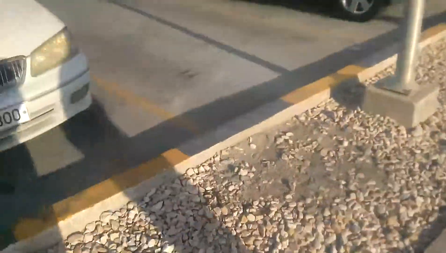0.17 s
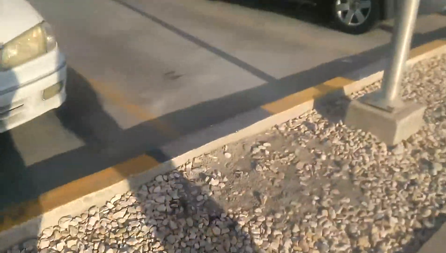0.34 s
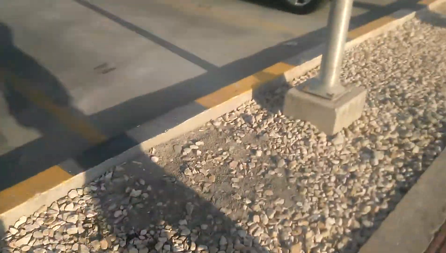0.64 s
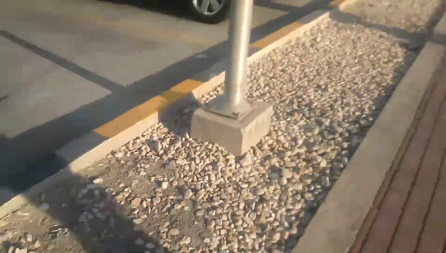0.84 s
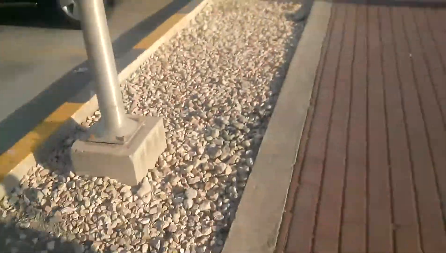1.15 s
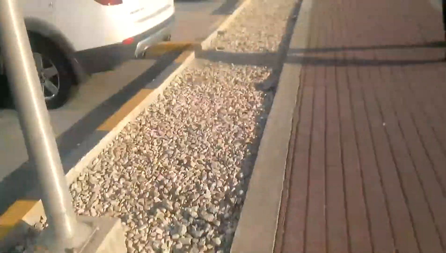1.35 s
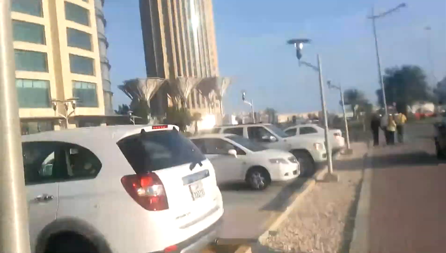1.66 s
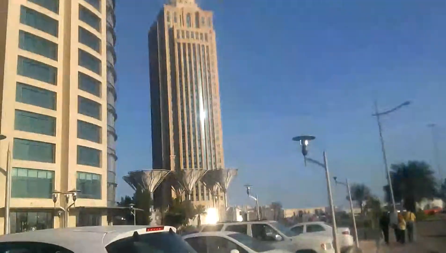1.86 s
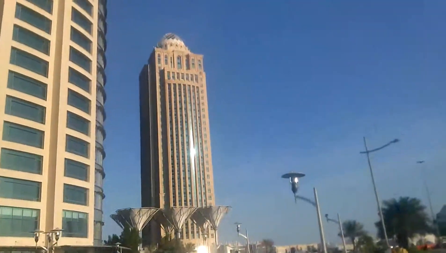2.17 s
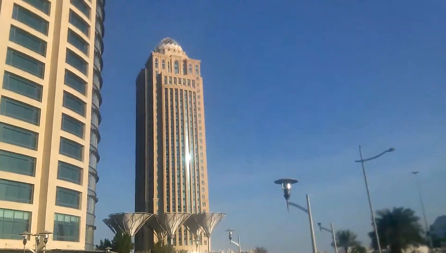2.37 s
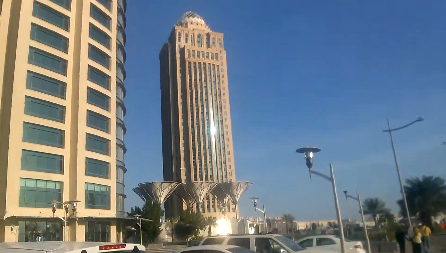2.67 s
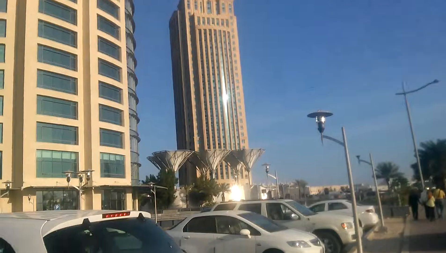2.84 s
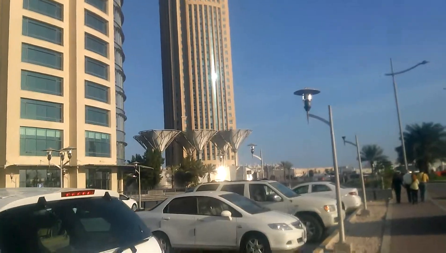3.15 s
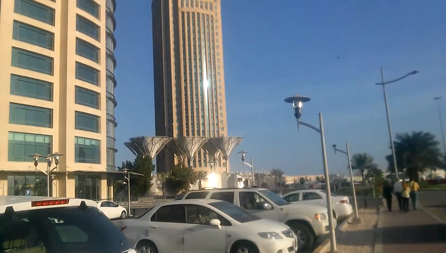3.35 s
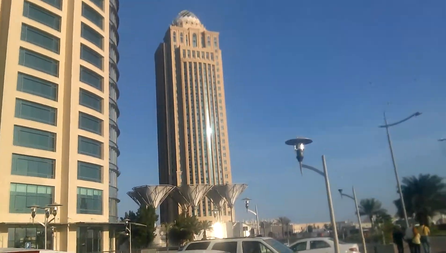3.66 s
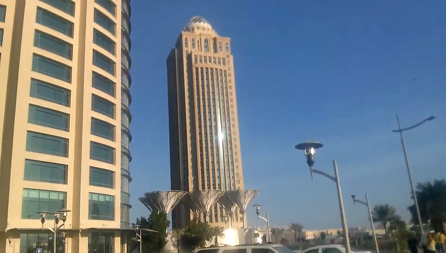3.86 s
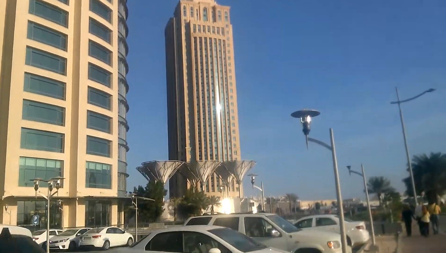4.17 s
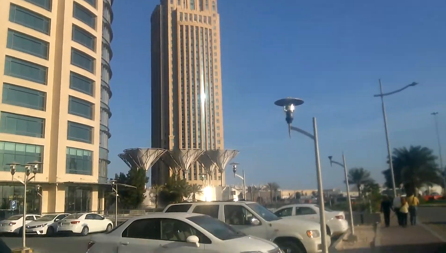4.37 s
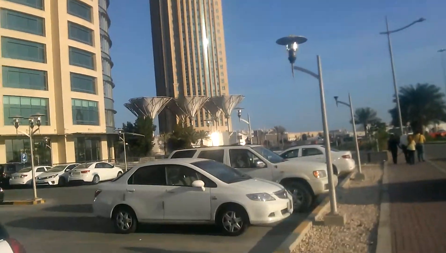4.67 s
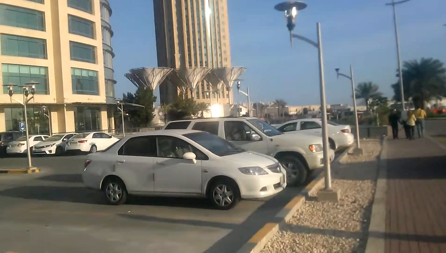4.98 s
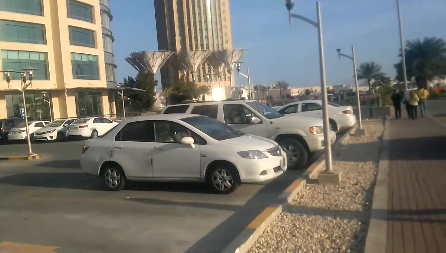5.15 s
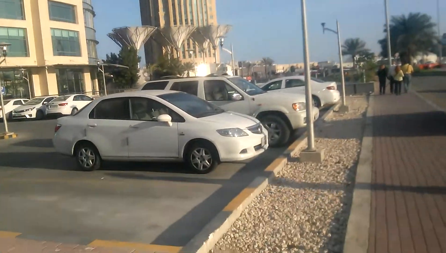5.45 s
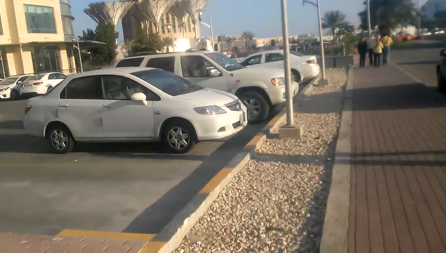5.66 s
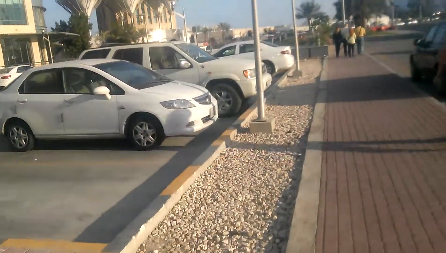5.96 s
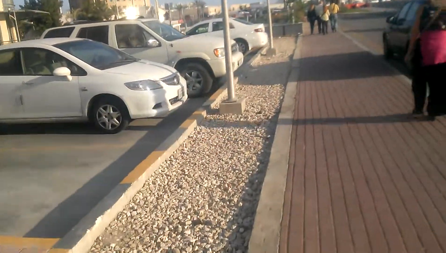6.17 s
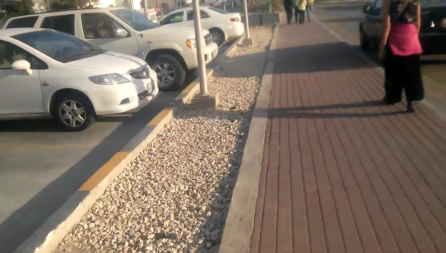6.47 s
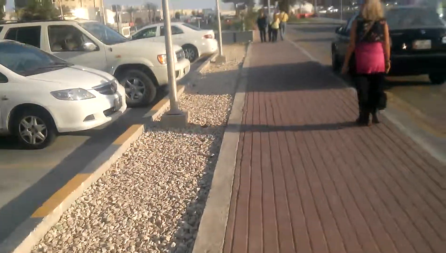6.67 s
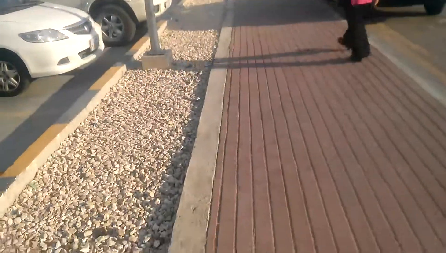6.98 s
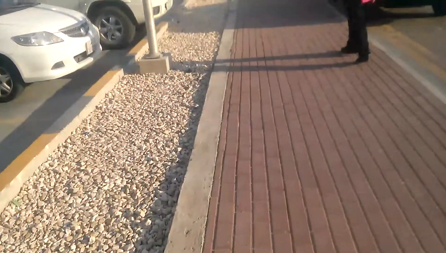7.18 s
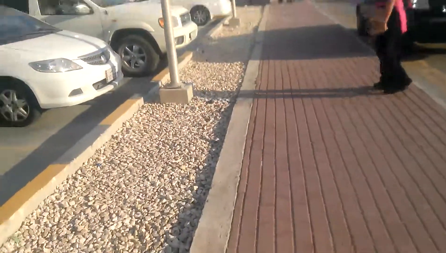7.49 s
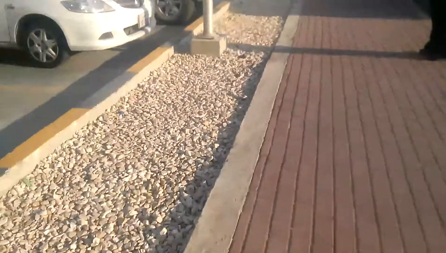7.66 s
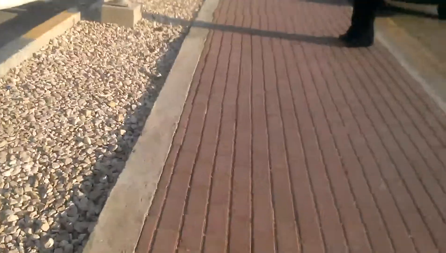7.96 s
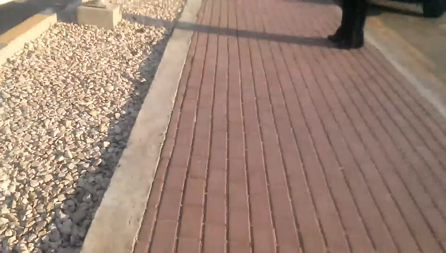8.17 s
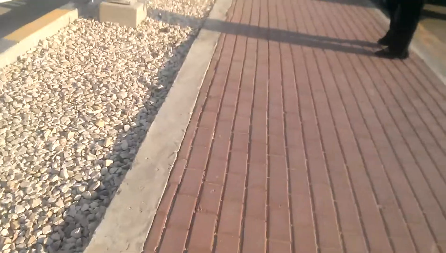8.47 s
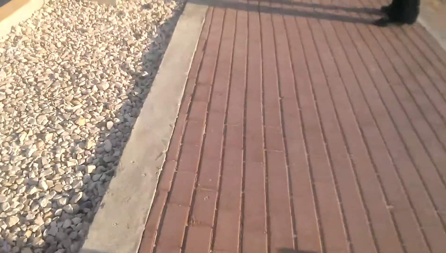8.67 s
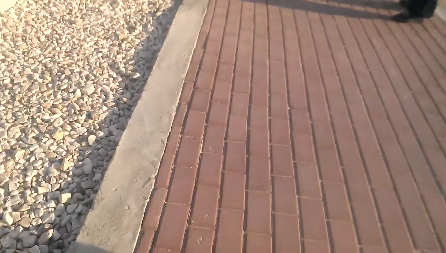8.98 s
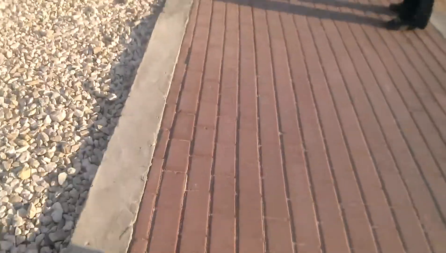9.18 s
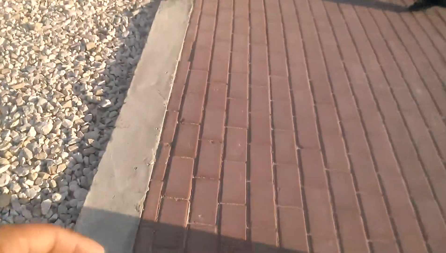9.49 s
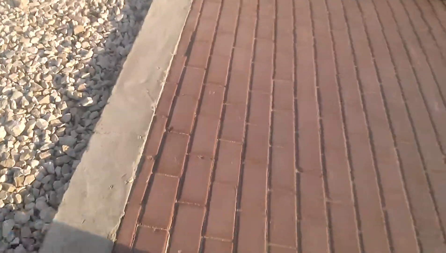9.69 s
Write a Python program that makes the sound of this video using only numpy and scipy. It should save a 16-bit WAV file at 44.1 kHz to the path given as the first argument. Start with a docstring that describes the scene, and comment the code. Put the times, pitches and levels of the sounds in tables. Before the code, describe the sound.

Wind buffets a phone microphone outdoors beside a car park and road, with low rumbles, flutters and dull slaps throughout. Behind it is a soft hum of far traffic and a faint engine murmur. Early on, a brake rubs and squeals thinly in broken chirps. Later a vehicle rushes past, its bright tyre hiss swelling, then a hollow roar trailing off into wind.

```python
"""Gusty wind buffets a phone's microphone: bands of noise rumble, flutter and slap with each gust.
Behind it, beside a car park and a road, far traffic and an engine hum as coloured and ringing noise.
A brake rubs as noise and squeals as a thin sine, with soft squeaks and bright ticks around it.
A vehicle rushes past: its tyre noise swells first, then a hollow roar follows as it draws away."""
import sys
import numpy as np
from scipy import signal
from scipy.fft import rfft, irfft, next_fast_len
from scipy.io import wavfile
from scipy.ndimage import uniform_filter1d, minimum_filter1d, map_coordinates

SR = 44100
rng = np.random.default_rng(int(sys.argv[2]) if len(sys.argv) > 2 else 0)


def digitize_waveform(pressure):
    """Quantize a signal to 16-bit integers and store it at the path in sys.argv[1].

    Rows of a 2-D input are taken as channels; values are limited to [-1, 1].
    """
    field = np.atleast_2d(pressure).T
    bounded = np.clip(field, -1, 1)
    quanta = np.round(bounded * 32767).astype(np.int16)
    wavfile.write(sys.argv[1], SR, quanta)


N = 433503
TIME = np.arange(N) / SR  # seconds


def from_db(db):
    """Turn decibels into a gain."""
    return 10 ** (np.asarray(db) / 20)


def rms_one(x):
    """Scale a sound to an average strength (rms) of 1."""
    return x / np.sqrt(np.mean(x ** 2) + 1e-20)


def in_time(rows):
    """Join the points of each column by straight lines; the first column is time in seconds."""
    seconds, *columns = np.transpose(rows)
    return [np.interp(TIME, seconds, column) for column in columns]


def fade_in(at, length):
    """A smooth step from 0 to 1 around a moment in seconds."""
    return .5 + .5 * np.tanh((TIME - at) / length)


def burst(start, length, attack, release):
    """An envelope that rises around its start, holds at 1 and dies away; all times in seconds."""
    rise = np.clip((TIME - start) / attack + .5, 0, 1)
    fall = np.exp(-np.clip(TIME - start - length, 0, 1) / release)
    return rise * fall


def drift(rate):
    """Slow random wandering with a spread of 1; changes faster than the rate in Hz are weakened."""
    size, step = 8192, 64  # number of slow points, samples between them
    hz = np.arange(size // 2 + 1) * SR / (size * step)
    spectrum = rfft(rng.standard_normal(size)) / (1 + (hz / rate) ** 2)
    slow = rms_one(irfft(spectrum))
    return np.interp(TIME, np.arange(size) * step / SR, slow)


def noise(spectrum):
    """Noise of a given colour, falling steeply beyond its ends; rms 1."""
    size = next_fast_len(N)
    log_hz = np.log(np.maximum(np.arange(size // 2 + 1) * SR / size, 1))
    hz, db = np.array(spectrum).T
    points = np.log(hz)
    beyond = np.abs(log_hz - np.clip(log_hz, points[0], points[-1]))
    gain = from_db(np.interp(log_hz, points, db) - 90 * beyond)
    return rms_one(irfft(rfft(rng.standard_normal(size)) * gain, size)[:N])


def resonance(hz, width_hz):
    """Noise ringing around a centre pitch that may move; rms 1."""
    phase = 2 * np.pi * np.cumsum(hz * np.ones(N)) / SR
    low = signal.butter(2, width_hz / 2, fs=SR, output="sos")
    a, b = signal.sosfilt(low, rng.standard_normal((2, N)))
    return rms_one(a * np.cos(phase) + b * np.sin(phase))


def steadied(x, span):
    """Even out swings in strength that are slower than the span in seconds."""
    size = max(int(span * SR), 2)
    power = uniform_filter1d(uniform_filter1d(x * x, size), size)
    return x / np.sqrt(power + 1e-9)


def blend(a, b, share):
    """Mix two unrelated sounds, giving b this share of the power."""
    share = np.clip(share, 0, 1)
    return np.sqrt(1 - share) * a + np.sqrt(share) * b


def reflected(x, strength, count=5):
    """Echoes off parked cars come and go, so the colour of the sound wanders."""
    echoes = np.zeros(N)
    for lag in rng.uniform(0.001924, .012, count):  # seconds
        moving_lag = lag * (1 + 0.033 * drift(0.5))
        echoes += drift(1.0) * np.interp(TIME - moving_lag, TIME, x)
    return x + strength * echoes


def patchy(x, depth_db, rate, count=12):
    """Turbulent air on the way makes each band swell and fade on its own; rms 1."""
    size = next_fast_len(N)
    spectrum = rfft(x, size)
    log_hz = np.log(np.maximum(np.arange(len(spectrum)) * SR / size, 1))
    centres = np.log(np.geomspace(400, 4500, count))
    total = np.zeros(N)
    for band in np.eye(count):
        band_gain = np.interp(log_hz, centres, band)
        band_sound = irfft(spectrum * band_gain, size)[:N]
        total += band_sound * from_db(depth_db * drift(rate))
    return rms_one(total)


def traffic(hum_db=3.5, hiss_db=3.0, late_db=-3.0):
    """Far tyres blend into a hum with a wandering drone, which gives way to the near vehicle."""
    # the hum and hiss of distant traffic slowly grow, and their level dips abruptly at times;
    # before the trims above: start_s, hum_level_db, treble_hiss_level_db
    levels = [(0, -38, -58), (.2, -36.5, -61), (.65, -41, -66.5), (.8, -39.5, -63), (1.35, -38, -62.5),
              (2.1, -37, -61.5), (2.13, -43, -66.5), (2.9, -38, -64.5), (3.57, -36.5, -61.5),
              (3.62, -40, -67.5), (4.04, -35.5, -57), (4.2, -40, -62), (4.7, -34, -56),
              (5.05, -35.5, -60.5), (5.28, -32.5, -55.5), (5.65, -35, -59), (6.1, -33.5, -55.5)]
    # colours of the hum and of the hiss: pitch_hz, relative_level_db (per Hz)
    hum_colour = [(200, -19), (330, 1), (450, 3.5), (560, -1.5), (700, 4), (980, 0.5), (1130, -3.5),
                  (1400, -9), (2000, -11.5), (2850, -14.5), (3250, -22), (4400, -22.5), (5500, -30.5),
                  (7000, -42)]
    hiss_colour = [(2940, -24), (5000, -3), (7030, -6.5), (8540, -3.5), (12600, -14), (15500, -26)]
    # the drone wanders in pitch as cars come and go: start_s, pitch_hz, share_of_hum (0-1)
    drone = [(0, 852, 0.38), (.9, 906, 0), (1.3, 944, 0.48), (2.0, 880, 0), (2.7, 1090, 0.2),
             (3.3, 903, 0.04), (4.6, 848, 0), (5.7, 975, 0.09)]

    hum_level, hiss_level = in_time(levels)
    drone_hz, drone_share = in_time(drone)
    tyres = blend(noise(hum_colour), resonance(drone_hz, width_hz=190), drone_share)
    far = patchy(reflected(tyres, strength=0.089), depth_db=2.0, rate=22.0)
    bed = from_db(hum_level + hum_db + .5 * drift(25)) * steadied(far, span=0.15)
    bed += from_db(hiss_level + hiss_db + 0.76 * drift(14)) * noise(hiss_colour)
    return bed * from_db(late_db * fade_in(6.05, 0.11) - 20.0 * fade_in(9.3, 0.3))


def murmur():
    """An engine among the parked cars murmurs faintly in two low resonances."""
    # how loud the engine is: start_s, level_db
    levels = [(0, -28), (.65, -26.5), (.85, -33), (1.3, -27), (1.9, -29.5), (2.6, -43), (9.83, -60)]
    # its low resonances: pitch_hz, width_hz, relative_level_db
    modes = [(151.4, 19.4, -5.5), (203.2, 48, -2.5)]

    level_db, = in_time(levels)
    tone = np.zeros(N)
    for hz, width, db in modes:
        tone += from_db(db) * steadied(resonance(hz, width), span=0.16)
    return from_db(level_db) * tone


def ticks(snap_db=6.0, tail_db=-29.0, t60=0.25, low_cut_hz=6000):
    """Each small tick close by is one bright snap with a faint hissing tail, 60 dB down after t60 s."""
    # when the ticks come; the levels get the snap and tail trims above: start_s, level_db
    tick_list = [(1.3017, -30), (1.3535, -37), (1.3593, -30), (1.3622, -28), (1.3708, -35), (3.052, -36),
                 (3.066, -37), (3.878, -40), (4.085, -34), (4.565, -42), (4.9506, -35), (8.9289, -21)]
    # colour of their tails: pitch_hz, relative_level_db (per Hz)
    tail_colour = [(2500, -11), (5500, -8), (9000, 2), (13000, -5), (16000, -12)]

    snaps, tails = np.zeros(N), np.zeros(N)
    for start, db in tick_list:
        snaps[round(start * SR)] = from_db(db + snap_db)
        decay_db = 60 * np.clip(TIME - start, 0, 1) / t60
        tails += from_db(db + tail_db - decay_db) * (TIME >= start)
    thin = signal.butter(2, low_cut_hz, "high", fs=SR, output="sos")
    return signal.sosfilt(thin, snaps + 1e-18) + tails * noise(tail_colour)


def squeaks():
    """Brief, soft squeaks: narrow rasping tones that swell and fade within a moment."""
    # each squeak, swelling to its middle: middle_s, pitch_hz, width_hz, length_s, level_db
    squeak_list = [(.648, 2930, 140, .015, -49.5), (.73, 3930, 350, .042, -47.5),
                   (.85, 4040, 400, .15, -53), (1.15, 7950, 90, .07, -63), (1.29, 4030, 80, .03, -52),
                   (1.32, 9420, 130, .04, -61), (1.43, 3955, 70, .045, -53), (1.557, 5900, 250, .007, -50),
                   (1.557, 7230, 300, .007, -56), (1.68, 7250, 250, .007, -57),
                   (6.428, 3980, 110, .014, -40), (6.63, 3630, 100, .05, -41), (6.845, 3585, 70, .025, -37)]

    total = np.zeros(N)
    for middle, hz, width, length, db in squeak_list:
        swell = np.exp(-((TIME - middle) / length) ** 2)
        total += from_db(db) * swell * steadied(resonance(hz, width), span=0.021)
    return total


def brake():
    """The pad rubs all the disc's modes, and one locks again and again into a thin squeal."""
    # the squeal's pitch, creeping up overall as the wheel slows: start_s, pitch_hz
    squeal_pitch = [(1.2, 4692), (1.26, 4670), (1.31, 4688), (1.38, 4694), (1.48, 4722), (1.8, 4708),
                    (1.9, 4724), (2.05, 4742), (2.5, 4740), (3.0, 4758)]
    # the brake catches and squeals: start_s, length_s, level_db
    squeals = [(1.207, .035, -40.5), (1.265, .09, -37.3), (1.36, .018, -46), (1.465, .02, -53),
               (1.575, .022, -50), (1.635, .025, -49), (1.705, .03, -50), (1.778, .045, -41.5),
               (1.845, .07, -42.5), (1.92, .07, -39), (2.015, .03, -44), (2.06, .03, -40.5),
               (2.135, .025, -50), (2.205, .02, -50), (2.26, .04, -55), (2.37, .03, -47),
               (2.445, .015, -52), (2.535, .04, -48), (2.635, .04, -53), (2.69, .04, -45.5),
               (2.785, .03, -50), (2.87, .08, -55), (3.285, .015, -57), (3.335, .015, -56.5)]
    # pad rubbing on the disc: start_s, level_db, upper_modes_db (added above 5000 Hz)
    rub_levels = [(0, -53, -26), (.65, -62, -19), (.95, -65, 6), (1.25, -49.5, -5), (1.55, -52.5, -1),
                  (1.8, -47.5, 0), (2.05, -58, -5), (2.15, -61, -11), (2.8, -60, -14), (3.6, -63, -22),
                  (4.0, -88, -28)]
    # ways the disc can ring: pitch_hz, width_hz, relative_level_db
    disc_modes = [(3970, 420, -3), (4560, 590, -0.5), (5860, 180, -14), (7200, 400, -14),
                  (7820, 130, -12.5), (9450, 300, -19), (10000, 8300, -12)]

    hz, = in_time(squeal_pitch)
    rub_db, upper_db = in_time(rub_levels)
    # each catch rings up and dies away; in between, the tone lingers faintly
    attack_s, release_s, linger_db = .016, .015, -61.0
    catches = np.zeros(N)
    for start, length, db in squeals:
        catches += (from_db(db) * burst(start, length, attack_s, release_s)) ** 2
    lingering = from_db(linger_db) * (1 - fade_in(2.92, .06))
    level = np.sqrt(catches + lingering ** 2)

    # a firm catch sings steadily, a light one flutters
    waver_hz, firm_db, light_db = 7, 1.0, 3.2
    waver_db = np.interp(level, from_db([-50, -38]), [light_db, firm_db])
    phase = 2 * np.pi * np.cumsum(hz + waver_hz * drift(73)) / SR
    squeal = level * from_db(waver_db * drift(75)) * np.sqrt(2) * np.sin(phase)

    # narrow modes catch and drop out at random, broad ones hiss on more evenly
    flicker_db, narrow_hz = 4.5, 400
    rub = np.zeros(N)
    for mode_hz, width, db in disc_modes:
        depth_db = flicker_db / (1 + width / narrow_hz)
        mode_db = db + upper_db * (mode_hz > 5000) + depth_db * np.clip(drift(18), -2, 1.5)
        rub += from_db(mode_db) * resonance(mode_hz, width)
    locked = fade_in(1.19, .01) * (1 - fade_in(3.55, .08))
    return squeal * locked + from_db(rub_db) * rms_one(rub)


def vehicle(tyre_db=0.0, tread_db=-1.05, air_db=1.0, far_cut_hz=1400):
    """Tyres howl and sing, sweep against their echo off the road and dull with distance."""
    # the passing vehicle, before the trims above: start_s, tyre_rush_level_db,
    # tread_sizzle_level_db, air_hiss_level_db
    levels = [(5.9, -28.5, -48, -59), (6.15, -27, -43.5, -55.5), (6.35, -29, -38.5, -46.5),
              (6.64, -28, -36.5, -44), (6.87, -22, -30, -39.5), (7.62, -19.5, -26, -33.5),
              (8.05, -25.5, -38, -44), (8.22, -20.5, -36, -47.5), (8.32, -24.5, -40.5, -45.5),
              (8.39, -29, -44, -50), (8.52, -31, -45.5, -55), (8.68, -30, -38.5, -55),
              (8.9, -34.5, -43.5, -56), (9.13, -32, -58, -56), (9.2, -37.5, -56, -55.5),
              (9.52, -33.5, -61, -58), (9.57, -44.5, -73, -64), (9.66, -35.5, -65, -58),
              (9.83, -29.5, -55, -54)]
    # colours of the rush, the sizzle and the hiss: pitch_hz, relative_level_db (per Hz)
    tyre_colour = [(330, -25), (450, 1.5), (600, -1), (800, 1), (1000, 1), (1300, -2.5), (1650, -8.5),
                   (2100, -11), (2800, -19.5)]
    tread_colour = [(1300, -18), (1900, -4.5), (2500, 1), (2850, 0.5), (3200, -2), (3550, -3.5),
                    (4200, -2.5), (5000, -2.5), (5900, -5), (6700, -24), (8000, -35)]
    air_colour = [(3000, 1), (4000, -6), (5000, -1), (6200, 3.5), (7100, 0), (8500, 2), (10200, 0.5),
                  (12700, -5.5), (15500, -13)]
    # the road's echo and the tyres' howl as the vehicle moves: start_s, echo_lag_ms,
    # echo_strength (0-1), howl_pitch_hz, howl_share (0-1)
    road = [(5.9, 1.1, 0.15, 500, 1), (6.3, 1.25, 0.07, 535.7, 0.85), (6.75, 1.53, 0.04, 635, 0.56),
            (7.3, 2.2, 0.02, 820.6, 0.13), (7.6, 2.6, 0.08, 898, 0), (7.85, 2.18, .28, 1015, .09),
            (8.25, 1.88, 0.2, 1011, 0.15), (8.55, 1.5, 0.1, 905, 0.54), (8.85, 2.1, .32, 780, 0.2),
            (9.83, 2.16, 0.23, 799, 0.26)]
    # the tread sings in a band that sinks as it goes by: start_s, pitch_hz, share_of_sizzle (0-1)
    tread_song = [(6.1, 2560, 0.77), (6.5, 2485, 0), (6.9, 2330, 0.1), (7.4, 2150, .08), (8.2, 2063, 0.13),
                  (8.8, 1921, 0.2)]
    # the hiss flares once more as the vehicle draws away: start_s, level_db
    late_hiss = [(8.3, -62), (8.42, -45), (8.52, -40.5), (8.7, -40.5), (8.9, -44), (9.13, -50), (9.25, -66),
                 (9.83, -75)]
    # colour of that late hiss: pitch_hz, relative_level_db (per Hz)
    late_hiss_colour = [(3200, -10), (3600, 0), (4100, -12), (5000, -5), (6300, 4), (6950, 2.5), (7900, -3),
                        (9000, 2.5), (10000, 2.5), (11000, -2), (12700, -4), (15500, -11)]

    tyre_level, tread_level, air_level = in_time(levels)
    lag_ms, echo, howl_hz, howl_share = in_time(road)
    late_db, = in_time(late_hiss)
    song_hz, song_share = in_time(tread_song)

    far_filter = signal.butter(2, far_cut_hz, fs=SR, output="sos")
    far = signal.sosfilt(far_filter, noise(tyre_colour))
    rolling = blend(noise(tyre_colour), far, fade_in(8.88, 0.83))
    rolling = blend(rolling, resonance(howl_hz, width_hz=304), howl_share)

    sizzle = patchy(noise(tread_colour), depth_db=1.5, rate=17)
    sizzle = blend(sizzle, resonance(song_hz, width_hz=200), song_share)
    # a narrow ring, its level relative to the sizzle
    ring_hz, ring_width_hz, ring_db = 3606, 310, -11
    sizzle = sizzle + from_db(ring_db) * resonance(ring_hz, ring_width_hz)

    # turbulent air on the way makes the colour flicker, while the swell stays smooth
    rolling = steadied(patchy(rolling, depth_db=1.5, rate=9.4), span=.12)
    rush = from_db(tyre_level + tyre_db + 1.2 * drift(35)) * rolling
    rush += from_db(tread_level + tread_db + 1.0 * drift(45)) * sizzle
    rush += from_db(air_level + air_db + 0.85 * drift(30)) * noise(air_colour)
    rush += from_db(late_db) * fade_in(8.3, .05) * noise(late_hiss_colour)
    rush = reflected(rush * fade_in(5.92, .08), strength=.1)
    road_echo = map_coordinates(rush, [(TIME - lag_ms / 1000) * SR], order=3)
    return rush + echo * road_echo


def wake(throb_db=1.0, edge_db=-9.0):
    """A hollow roar with a broad, rushing edge is thrown out behind the vehicle."""
    # the roar's two hollow resonances: start_s, lower_pitch_hz, upper_pitch_hz, upper_share (0-1)
    hollow_tones = [(7.6, 309.2, 436.3, 0.03), (8.0, 315, 441.2, 0.52), (8.35, 310.8, 453, 0.41),
                    (8.7, 334, 503, 0.63), (8.95, 334.4, 496, 0.51), (9.2, 277.7, 471.5, 0.5)]
    # colour of the roar's broad edge: pitch_hz, relative_level_db (per Hz)
    edge_colour = [(180, 1.5), (350, 3), (560, -10), (720, -3), (850, -16)]

    # the wake sets in, grows to its peak and eases off
    start_s, peak_s, end_s = 7.66, 8.72, 9.13
    peak_db, rise_db_per_s, fall_db_per_s = -15.5, 3.5, 9
    past_peak = TIME - peak_s
    roar_db = peak_db + np.minimum(rise_db_per_s * past_peak, -fall_db_per_s * past_peak)
    lower_hz, upper_hz, share = in_time(hollow_tones)
    roar = blend(resonance(lower_hz, width_hz=160), resonance(upper_hz, width_hz=152), share)
    roar = roar + from_db(edge_db) * noise(edge_colour)
    sounding = fade_in(start_s, 0.076) * (1 - fade_in(end_s, 0.047))
    return from_db(roar_db + throb_db * drift(16.1)) * steadied(roar, span=0.14) * sounding


def wind(surge_gain_db=0.5, rumble_gain_db=1.3, flutter_gain_db=1.5, slap_gain_db=0.0,
         breeze_gain_db=-4.0, lumpy_db=2.0, slap_lumpy_db=3.5, swell_db=1.93):
    """The breeze rumbles on; in gusts large eddies push on the port, small ones flutter and slap."""
    # colours from the largest eddies to the smallest: pitch_hz, relative_level_db (per Hz)
    surge_colour = [(8, -2), (16, 3), (28, 1.5), (42, -2), (52, -1.5), (70, -34)]
    rumble_colour = [(34, -41), (50, 1), (65, 0), (85, 0.5), (108, -6.5), (135, -20), (200, -52)]
    flutter_colour = [(75, -29), (105, 1.5), (125, 2), (160, 1), (200, -2.5), (250, -18), (330, -21.5),
                      (600, -45)]
    slap_colour = [(150, -33), (215, 6.5), (280, 3.5), (380, -4), (520, -12), (750, -15.5), (1100, -42),
                   (1500, -36), (2200, -58), (5000, -70)]
    # the breeze between gusts, before the gains above: start_s, rumble_level_db
    breeze = [(0.0, -18), (.75, -21), (1.2, -21.5), (1.7, -23.5), (2.3, -13), (3.0, -21), (4.5, -19),
              (5.3, -25), (6.6, -14.5), (6.8, -28.5), (6.95, -26), (7.1, -18.5), (7.6, -20.5), (8.9, -23),
              (9.3, -24), (9.83, -20.5)]
    # gusts that hit the microphone's port, before the gains above: start_s, length_s,
    # rumble_level_db, surge_db (slow pressure) and slap_db (hard), both relative to the rumble
    gusts = [(0, 0.013, -17, 13, -15), (0.425, 0.074, -24.5, 15, -16), (0.643, 0.093, -33, -3, 4),
             (0.884, 0.072, -21.5, -12, -17), (.99, .08, -35, -6, 5), (1.25, .05, -36, -6, 2.5),
             (1.35, 0.032, -31, -6, 3), (1.416, 0.35, -25, 13, -31), (1.787, 0.3, -17, 3, -28),
             (1.895, 0.045, -19.5, -8, -10), (2.019, 0.042, -16, -5, -2.5),
             (2.086, 0.083, -11.5, -11, -10.5), (2.279, 0.054, -11, -14, -7.5),
             (2.386, 0.44, -19.5, -9, -15), (2.773, 0.094, -12, -2.5, -16.5), (3.007, 0.48, -18, 3, -27),
             (3.256, 0.11, -11, -1.5, -12.5), (3.41, 0.14, -12.5, -9, -24), (3.582, 0.028, -8, -16, -9.5),
             (3.728, 0.043, -16.5, -6, -2), (3.79, 0.1, -16, 1, -8.5), (4.064, 0.073, -12.5, -3, -8),
             (4.153, 0.037, -8, -0.5, -8.5), (4.233, 0.15, -15, -19, -11.5), (4.383, 0.11, -18, -1, -31),
             (4.598, 0.06, -14, 4, -32), (4.745, 0.15, -17, 1.5, -14.5), (4.874, 0.15, -13, -16, -12.5),
             (5.053, 0.37, -19.5, 7.5, -27), (5.473, 0.15, -15, 4.5, -17.5), (5.68, 0.058, -20, 9, -9),
             (5.817, 0.24, -13, 1.5, -13.5), (6.24, 0.1, -12.5, 3.5, -17), (6.439, 0.059, -15, 7, -28),
             (6.489, 0.1, -14, -10, -2), (7.145, 0.063, -14.5, 2, -20), (7.285, 0.11, -27, 12.5, -1.5),
             (7.932, 0.11, -21.5, 10.5, -10), (8.278, 0.19, -15, -10, -11), (8.662, 0.098, -21, 2, 1),
             (8.983, 0.14, -15, 0, -32), (9.101, 0.056, -10, -1.5, -0.5), (9.17, 0.086, -15, -3, -6),
             (9.294, 0.29, -15, 1.5, -4.5), (9.621, 0.074, -12, 0.5, 1.5), (9.729, 0.05, -15.5, 3, -8.5)]

    breeze_db, = in_time(breeze)
    # rows below: surge, rumble, flutter, slap; the breeze's levels are relative to its rumble
    calm_db = np.add.outer([4.5, 0, -2.5, -10], breeze_db + breeze_gain_db)
    calm = from_db(calm_db) ** 2
    power = calm.copy()
    # every gust builds up, holds and dies away
    attack_s, release_s = .035, .028
    # the harder a gust slaps, the more small eddies flutter: dB per dB
    flutter_per_slap = 0.38
    for start, length, db, surge_db, slap_db in gusts:
        strengths = from_db(db + np.array([surge_db, 0, flutter_per_slap * slap_db, slap_db]))
        power += np.outer(strengths, burst(start, length, attack_s, release_s)) ** 2

    # the flow is the more uneven the more the gusts outweigh the breeze
    gusty = np.sqrt(np.clip(1 - calm / power, .1, 1))
    surge, rumble, flutter, slaps = np.sqrt(power) * from_db(swell_db * gusty * drift(25))
    eddies = drift(25) * gusty[-1]
    lumps = from_db(lumpy_db * eddies)
    slap_lumps = from_db(slap_lumpy_db * eddies)

    # the lumpy flow is drawn into rolling eddies of a wandering rate
    roll_hz, roll_wander_octaves, roll_width_hz, roll_share = 66, .3, 22, .45
    rolls = resonance(roll_hz * 2 ** (roll_wander_octaves * drift(4)), roll_width_hz)
    rolling = blend(noise(rumble_colour), rolls, roll_share * gusty[1])

    out = surge * from_db(surge_gain_db) * steadied(noise(surge_colour), span=0.15)
    out += rumble * from_db(rumble_gain_db) * steadied(rolling * lumps, span=0.056)
    out += flutter * from_db(flutter_gain_db) * steadied(noise(flutter_colour) * lumps, span=0.065)
    out += slaps * from_db(slap_gain_db) * steadied(noise(slap_colour) * slap_lumps, span=0.052)
    return out


def scene():
    """The street, with the wind on top, at one microphone."""
    street = traffic() + murmur() + ticks() + squeaks() + brake() + vehicle() + wake()
    return (street + wind())[None]


def limiter(x, release_db_per_s=219.0):
    """Turn the gain down just ahead of each overload and let it recover."""
    ceiling, size = .98, 96  # highest level, smoothing in samples
    over_db = 20 * np.log10(np.maximum(np.abs(x).max(axis=0) / ceiling, 1))
    recovery_db = release_db_per_s * TIME
    held_db = np.maximum.accumulate(over_db + recovery_db) - recovery_db
    gain = minimum_filter1d(from_db(-held_db), size)
    return x * uniform_filter1d(gain, size)


def record(dry):
    """Limit the loudest moments, then cut the treble above 15500 Hz."""
    top_cut = signal.ellip(10, .1, 90, 15500, fs=SR, output="sos")
    return signal.sosfilt(top_cut, limiter(dry))


dry = scene()
out = record(dry)
digitize_waveform(out)
```